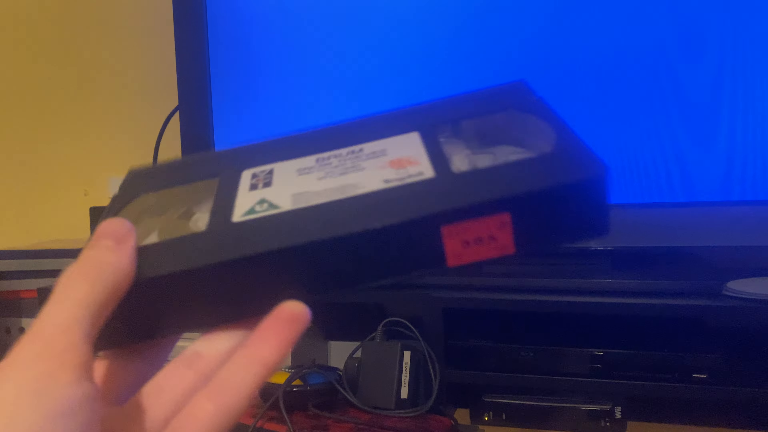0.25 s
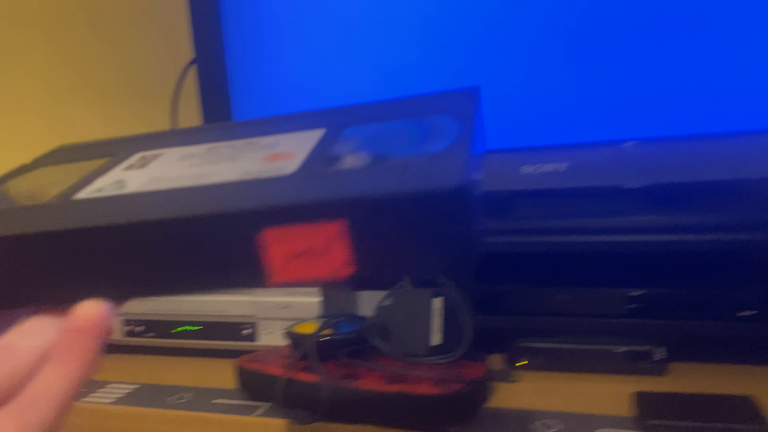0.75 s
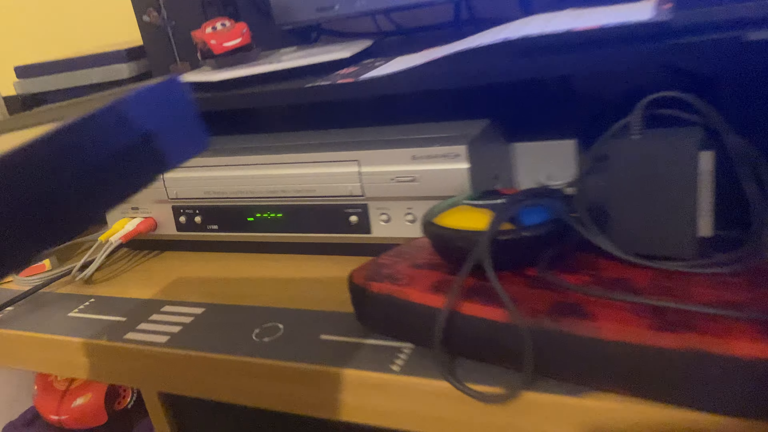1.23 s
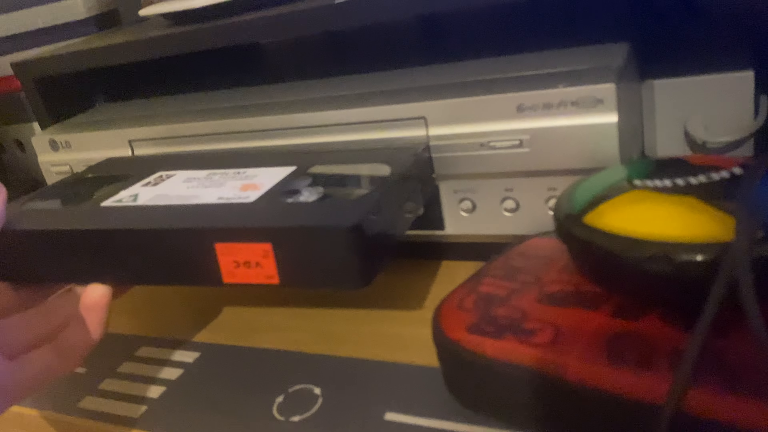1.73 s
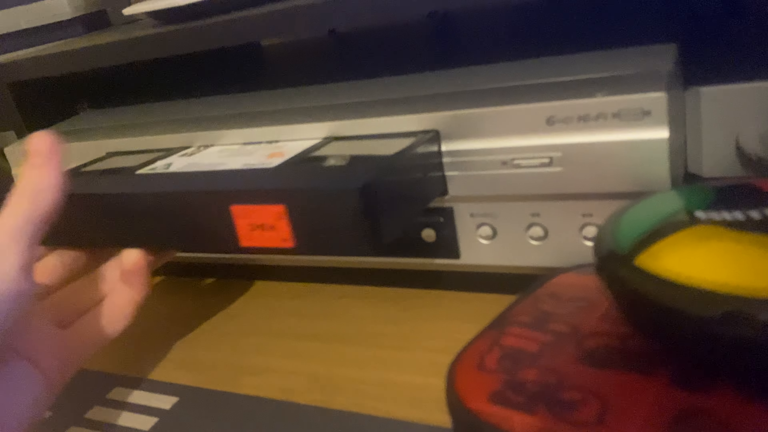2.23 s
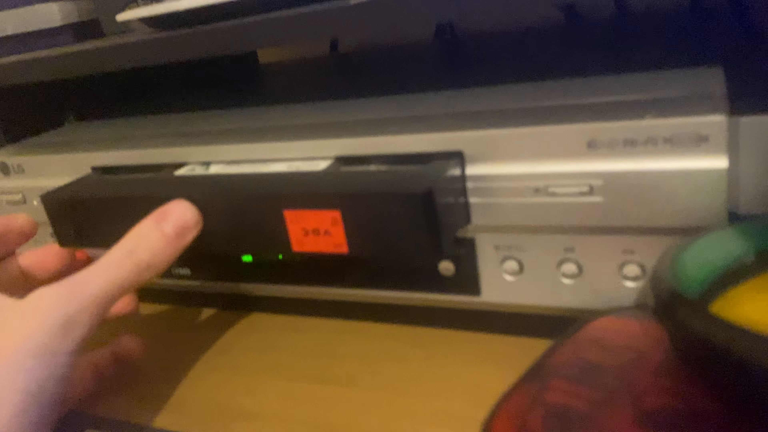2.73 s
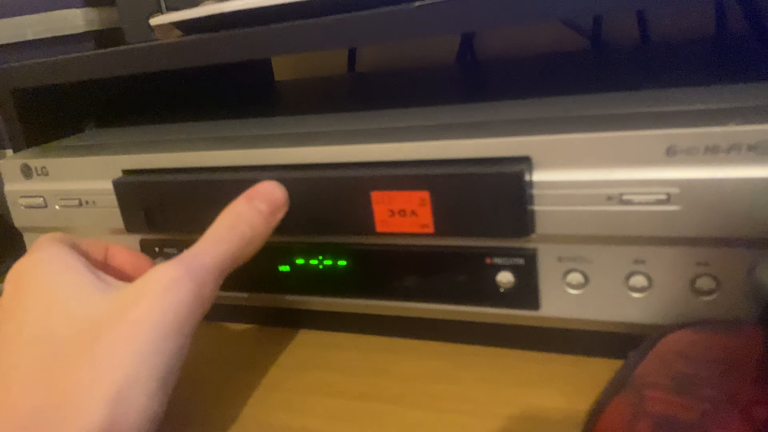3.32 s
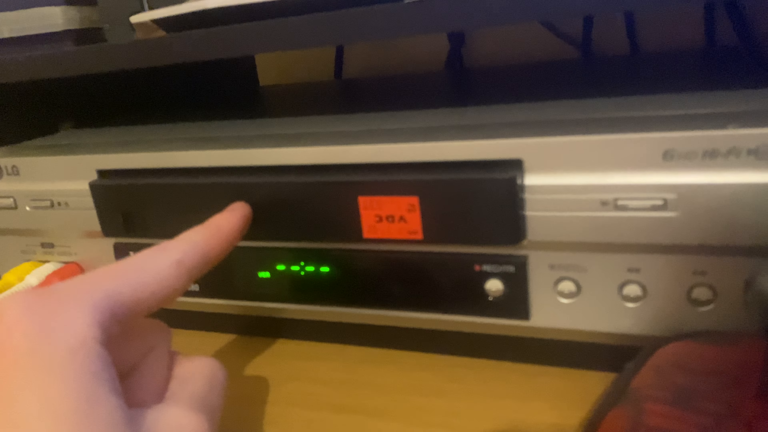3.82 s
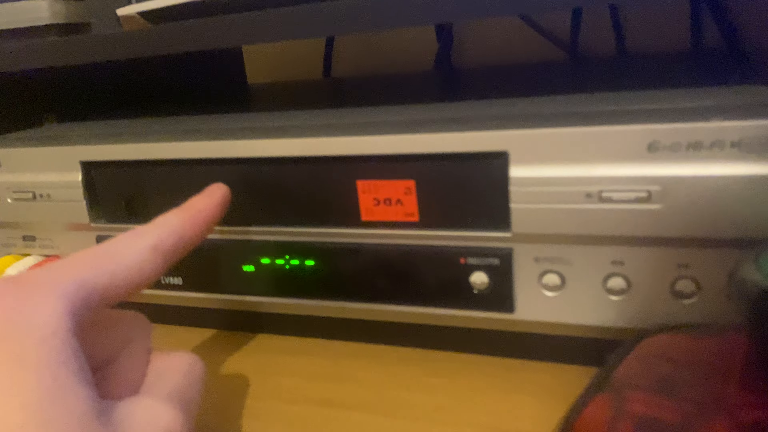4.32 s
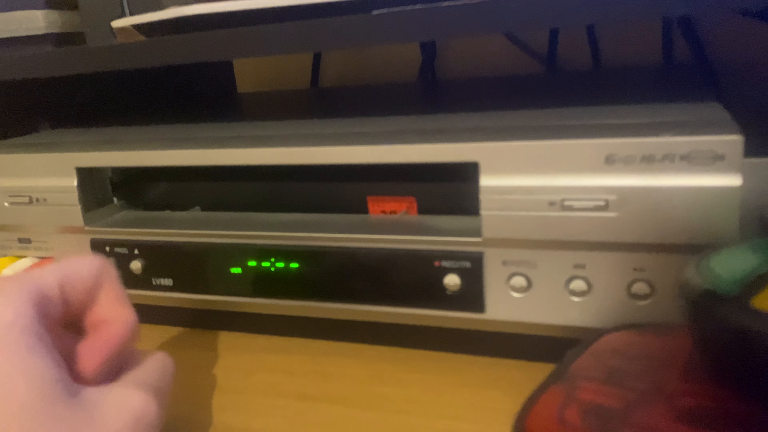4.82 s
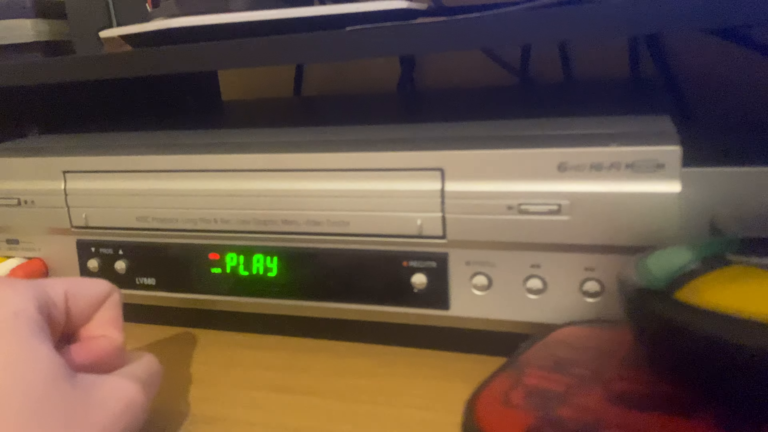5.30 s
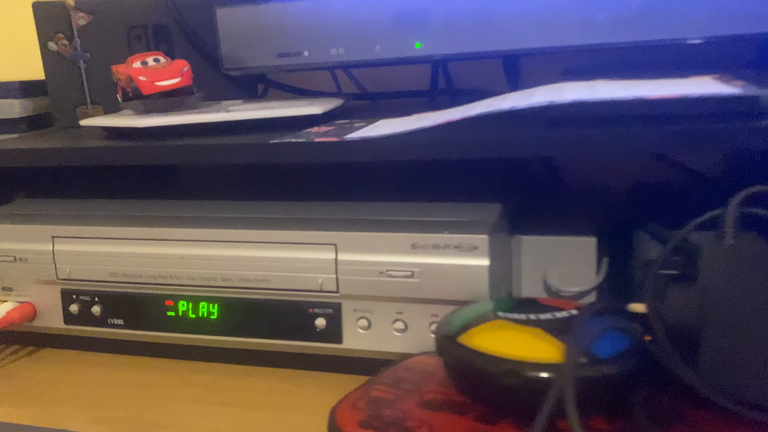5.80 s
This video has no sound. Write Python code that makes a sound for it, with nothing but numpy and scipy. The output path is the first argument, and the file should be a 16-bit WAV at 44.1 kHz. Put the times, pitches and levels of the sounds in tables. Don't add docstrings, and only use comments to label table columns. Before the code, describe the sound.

Close hand-held sound in a small quiet room: bumps, a burst of hollow plastic clatter, clicks, motor whirr, sharp clunk, faint steady whine.

```python
import sys
import numpy as np
from scipy import signal
from scipy.fft import rfft, irfft, next_fast_len
from scipy.io import wavfile
from scipy.ndimage import uniform_filter1d, map_coordinates

SR = 44100
rng = np.random.default_rng(int(sys.argv[2]) if len(sys.argv) > 2 else 0)


def voltage_ratio(decibels):
    exponent = np.asarray(decibels, float) / 20
    return 10 ** exponent


def wav_record(signal):
    frames = np.transpose(np.atleast_2d(signal))
    bounded = np.clip(frames, -1, 1)
    quanta = np.round(bounded * 32767).astype(np.int16)
    wavfile.write(sys.argv[1], SR, quanta)


N = 266893

# (time [s], level [dB])
SLIDE_PRESSURE = [(0, -64), (.72, -63.5), (.86, -51), (1.04, -63.5), (1.46, -56.5), (1.7, -37.5),
                  (1.85, -58.5), (2.11, -41), (2.51, -42), (2.7, -52), (3.03, -67.5), (3.32, -54),
                  (3.66, -67.5), (3.9, -65), (4.8, -53), (5.24, -55), (5.4, -63.5), (6.05, -64)]


def unit(x):
    return x / np.sqrt(np.mean(x ** 2) + 1e-20)


def along(points, hz):
    f, v = np.transpose(points)
    return np.interp(np.log(hz + 1), np.log(f + 1), v)


def curves(rows):
    s, *columns = np.transpose(rows)
    t = np.arange(N) / SR
    gate = uniform_filter1d(1. * (t >= s[0]) * (t <= s[-1]), size=2000)
    return [np.interp(t, s, column) for column in columns] + [gate]


def wobble(rate):
    knots = rng.standard_normal(int(N * rate / SR) + 4)
    return map_coordinates(knots, [np.arange(N) * rate / SR])


def filtered(x, response):
    m = next_fast_len(x.shape[-1] + 8192)
    spectrum = rfft(x, m) * response(np.fft.rfftfreq(m, 1 / SR))
    return irfft(spectrum, m)[..., :x.shape[-1]]


def low_cut(hz, corner, order=2):
    return hz ** order / (hz ** order + corner ** order)


def modes(peaks):
    def response(f):
        total = 0
        for k, (centre, width, db) in enumerate(peaks):
            total = total + (-1) ** k * voltage_ratio(db) * 1j * f * width / (centre ** 2 - f * f + 1j * f * width)
        return total
    return response


def hiss(spectrum, flutter_db, rate):
    pair = filtered(rng.standard_normal((2, N)), lambda hz: voltage_ratio(along(spectrum, hz)))
    return unit(pair * voltage_ratio(flutter_db * wobble(rate)))


def tone(hz, blur):
    phase = 2 * np.pi * np.cumsum(hz) / SR + blur * wobble(40)
    return np.sqrt(2) * np.sin(phase) * [[1.3], [.3]]


def room_air():
    # (frequency [Hz], level [dB per Hz])
    air = [(100, 2.5), (300, -1.5), (1200, 2.5), (2500, 1), (5500, -12.5), (7500, -22), (10500, -17),
           (14500, -14.5), (15200, -14), (15700, -20)]
    return voltage_ratio(-68.5) * hiss(air, 0.59, 18)


def screen_whistle():
    return voltage_ratio(-86.5) * tone(15190 + 90 * wobble(200), 0.8)


def far_engine():
    # (time [s], pitch [Hz], level [dB], upper drone level [dB])
    drone = [
        (0, 189, -82, -64),
        (.24, 189.1, -75, -65),
        (.28, 182, -63, -63),
        (.9, 186.2, -59, -67.5),
        (1.05, 187.8, -74, -71),
        (1.3, 179, -88, -67),
    ]
    hz, db, upper_db, gate = curves(drone)
    upper = unit(filtered(rng.standard_normal((2, N)), modes([(495, 40, -1.2), (640, 60, -0.31)])))
    note = voltage_ratio(db) * tone(hz, 0.67)
    low_order = voltage_ratio(-63 + 3 * wobble(9.9)) * tone(.4 * hz, 0.6)
    return gate * (note + low_order + voltage_ratio(upper_db) * upper)


def handling_rumble():
    # (time [s], level [dB])
    grip = [(0, -72), (.2, -64.5), (.42, -62), (.67, -63), (.81, -55), (.94, -63), (1.41, -73.5),
            (1.53, -53), (1.7, -50.5), (1.85, -52.5), (2.03, -83.5), (2.42, -60.5), (2.8, -90), (3.32, -72),
            (4.04, -93), (4.63, -79), (4.9, -62), (5.1, -83)]
    # (frequency [Hz], level [dB per Hz])
    deep_colour = [(25, -30), (45, 18), (72, 19.5), (100, 17), (140, -48.5)]
    # (frequency [Hz], level [dB per Hz])
    low_colour = [(80, -14), (130, 4.5), (200, 8.5), (300, -3), (450, -0.5), (800, -43)]
    grip_over_deep_db, shelf_db = 2, -10
    deep_db = np.interp(np.arange(N) / SR, *np.transpose(grip))
    low_level = np.hypot(voltage_ratio(deep_db + grip_over_deep_db), voltage_ratio(curves(SLIDE_PRESSURE)[0] + shelf_db))
    deep = hiss(deep_colour, 2.1, 9)
    quarter_turned = filtered(deep[0], lambda f: 1j)
    deep = np.array([deep[0], .9 * quarter_turned + .4 * deep[1]])
    return voltage_ratio(deep_db + 6) * deep + low_level * hiss(low_colour, 3, 19)


def rubbing():
    # (frequency [Hz], level [dB per Hz])
    body_colour = [(250, -6), (600, -4.5), (1100, -1), (1800, 1), (2400, -6.5), (3500, -44)]
    # (frequency [Hz], level [dB per Hz])
    hiss_colour = [(1500, -25), (2600, -0.5), (5000, -8), (7500, -16.5), (11000, -12.5), (15500, -31)]
    press_db, hiss_at_press_db, hiss_growth = -54.5, -65, 1.11
    body_db, _ = curves(SLIDE_PRESSURE)
    hiss_db = hiss_at_press_db + hiss_growth * (body_db - press_db)
    grain = voltage_ratio(1.5 * wobble(45))
    body = voltage_ratio(body_db) * hiss(body_colour, 1.5, 120)
    bright = voltage_ratio(hiss_db - 2) * hiss(hiss_colour, 2, 200)
    return grain * (body + bright)


def contacts():
    # (time [s], peak [dB], rattle t60 [s], boom [dB])
    thuds = [(0.1932, -54.5, 0.096, -1.5), (0.6681, -50.5, 0.16, -13), (1.0623, -52.5, 0.046, -16),
             (1.2055, -44.5, 0.025, 0), (1.883, -53, 0.039, -8), (2.0542, -19, 0.056, -6),
             (2.109, -40.5, 0.042, -6), (2.3845, -22.5, 0.066, -5), (2.4268, -36, 0.024, 22.5),
             (2.4543, -40, 0.23, -6), (2.522, -37, 0.2, -2), (2.553, -31.5, 0.055, -7),
             (3.0257, -37, 0.075, 3.5), (3.378, -64, 0.1, 11.5), (3.837, -48.5, 0.076, -8.5),
             (4.243, -41, 0.055, -6), (4.279, -47, 0.055, -5), (4.575, -49, 0.28, -2.5),
             (4.7506, -24, 0.12, -6.5), (4.7658, -23, 0.1, -10), (4.7773, -20, 0.018, 4),
             (4.798, -29.5, 0.057, -7), (4.88, -40.5, 0.13, -7.5), (5.129, -33.5, 0.13, -17.5),
             (5.1594, -45, 0.062, -10), (5.243, -50.5, 0.051, 5), (6.0444, -55, .07, 11)]
    # (time [s], peak [dB], rattle t60 [s], sparkle [dB])
    clacks = [(0.304, -37.5, 0.051, -18), (1.405, -45.5, 0.12, -22), (1.496, -50, 0.1, -30),
              (1.5704, -17, 0.091, -6.5), (1.6128, -17.5, 0.049, 0.5), (1.6385, -26, 0.085, 2),
              (1.6575, -19, 0.087, 2), (1.7316, -22, 0.05, 0), (1.9134, -24.5, 0.13, -8.5),
              (1.9619, -22, 0.099, -4), (1.989, -22, 0.088, -7), (2.0083, -12, 0.076, -4),
              (2.1443, -26.5, 0.05, -18), (2.1528, -20.5, 0.044, -12), (2.1946, -23.5, 0.1, -14),
              (2.207, -29, 0.042, -11), (2.2447, -21.5, 0.054, -2), (2.2684, -22, 0.096, -2.5),
              (2.285, -26, 0.058, -5), (2.3175, -32, 0.091, -9), (2.333, -28, .043, -8),
              (2.592, -31, 0.07, -24)]
    # (time [s], peak [dB], rattle t60 [s], sparkle [dB])
    ticks = [(0.318, -37, .085, -17.5), (0.753, -43.5, 0.13, -10), (1.4227, -45, 0.14, -9),
             (1.5775, -10.5, 0.032, -8), (1.5954, -41, 0.029, -22), (1.6185, -20.5, 0.08, -16),
             (1.677, -23, 0.095, -20), (1.713, -24.5, 0.11, -8.5), (2.09, -30.5, 0.075, -10.5),
             (2.6142, -29, 0.038, -15.5), (2.7192, -34, 0.042, -8.5), (2.9963, -40, 0.17, -11),
             (3.473, -53, .053, -4.5), (3.631, -46.5, 0.029, -37), (3.907, -38, 0.069, -16),
             (3.9791, -48, 0.081, -32), (4.1763, -47, 0.025, -1), (4.621, -36.5, 0.033, -4),
             (5.5924, -50.5, 0.092, 0.5), (5.8928, -50.5, 0.13, -13.5)]
    # (time [s], peak [dB], rattle t60 [s], sparkle [dB])
    levers = [(2.8485, -49, 0.21, -10), (2.8775, -44.5, 0.21, -15), (2.9396, -37.5, 0.23, -14.5),
              (3.2547, -28, 0.063, -12.5), (3.279, -42.5, 0.14, -11), (3.341, -31, 0.093, -18),
              (3.3472, -24.5, 0.048, -6.5), (3.936, -41, 0.095, -24), (4.3136, -51.5, .07, -3.5),
              (4.7172, -34, 0.047, -17), (4.729, -25.5, 0.177, 1.5), (4.738, -29.5, 0.084, -0.5),
              (4.9057, -25.5, 0.14, -8), (4.926, -26.5, 0.036, 0.5), (4.949, -38, 0.031, -20),
              (5.195, -41, 0.11, -8)]
    found = []
    for s, db, t60, boom_db in thuds:
        sparkle_db = -4.5 + .4 * (db + 18.5)
        found.append((s, db, -0.5, boom_db, sparkle_db, t60))
    for rows, shell_db, boom_db in [(ticks, -26, -23), (clacks, -3, -16), (levers, -2.5, -14.5)]:
        for s, db, t60, sparkle_db in rows:
            found.append((s, db, shell_db, boom_db, sparkle_db, t60))
    return sorted(found)


def knocks():
    # (frequency [Hz], level [dB])
    plastic = [(640, 4), (920, 4.5), (1150, -3.5), (1270, -3), (1440, -2), (1880, 1), (2050, -6),
               (2290, -3.5), (2440, -11.5), (3570, -4), (4400, -11), (5400, -8.5), (6450, -2.5),
               (11350, -12.5)]
    # (frequency [Hz], level [dB per Hz])
    clack_colour = [(500, -8.5), (1300, 3), (2200, 3.5), (3500, -9.5), (5000, -6.5), (6500, -11.5),
                    (9000, -52)]
    # (frequency [Hz], level [dB per Hz])
    sparkle_colour = [(4000, 0), (6500, 1.5), (9000, 5.5), (11300, 6), (12500, 2.5), (15500, -2.5)]
    # (frequency [Hz], width [Hz], level [dB])
    shell_modes = [(756, 220, -4.5), (900, 163, 4.5), (1150, 224, -2.5)]
    # (frequency [Hz], width [Hz], level [dB])
    case_modes = [(203, 60, -1.5), (302, 51, 9), (345.7, 98, -1)]
    mode_hz, mode_db = np.transpose(plastic)[:, :, None]
    clack, sparkle, shell, boom, ring = np.zeros((5, 2, N + SR))
    for s, db, shell_db, boom_db, sparkle_db, t60 in contacts():
        noise = rng.standard_normal((3, SR // 6))
        chance = rng.standard_normal((3, len(plastic), 1))
        t60 = np.clip(t60, .015, .3)
        noise = noise[:, :round(t60 * SR)]
        t = np.arange(noise.shape[1]) / SR
        fast = uniform_filter1d(noise[2], size=40)
        slow = uniform_filter1d(noise[0] + noise[1], size=200)
        chatter = voltage_ratio(15.6 * fast + 12 * slow)
        start = 1 - np.exp(-t / (0.017 * t60))
        shape = voltage_ratio(db - 2.5 - 60 * (t / t60) ** 1.55) * start
        burst = shape * chatter * noise[:2]
        at = slice(round(s * SR), round(s * SR) + len(t))
        clack[:, at] += burst
        sparkle[:, at] += voltage_ratio(sparkle_db - 60 * t / 0.12) * burst * chatter ** 0.55
        shell[:, at] += voltage_ratio(shell_db) * burst
        case_start = 1 - np.exp(-t / 0.014)
        boom[:, at] += voltage_ratio(boom_db + 7) * case_start * shape * noise[:2]
        phase = 2 * np.pi * (mode_hz * (1 + 0.028 * chance[1]) * t + chance[2])
        high_db = np.where(mode_hz > 6000, sparkle_db + 5.5, 0)
        kind_db = np.where(mode_hz < 1500, shell_db + 4, high_db)
        strength = voltage_ratio(mode_db + 4.5 * chance[0] + kind_db)
        notes = [np.sum(strength * np.sin(phase), 0), np.sum(strength * np.cos(phase), 0)]
        ring[:, at] += voltage_ratio(-20.0) * shape * np.array(notes)
    high = filtered(clack, lambda hz: voltage_ratio(along(clack_colour, hz) + 3.0))
    high = high + filtered(sparkle, lambda hz: voltage_ratio(along(sparkle_colour, hz) - 1))
    high = filtered(high + ring, lambda hz: low_cut(hz, 260))

    def case_response(hz):
        return modes(case_modes)(hz) / (1 + (hz / 520) ** 4) * low_cut(hz, 130)

    hollow = voltage_ratio(13.5) * filtered(shell, lambda hz: modes(shell_modes)(hz) * low_cut(hz, 540, 3))
    case = voltage_ratio(19.0) * filtered(boom, case_response)
    return (high + hollow + case)[:, :N]


def room(x):
    # (frequency [Hz], t60 [s])
    decay = [(200, 0.58), (1500, 0.29), (6000, 0.22), (14000, 0.15)]
    hz, t, z = signal.stft(rng.standard_normal((2, SR // 2)), SR, nperseg=256)
    fading = voltage_ratio(-60 * t / along(decay, hz)[:, None])
    tail = signal.istft(z * fading, SR, nperseg=256)[1]
    late = np.pad(x, ((0, 0), (300, 0)))
    return signal.fftconvolve(late, tail / np.linalg.norm(tail[0]), axes=1)[:, :N]


def swishes():
    # (centre [s], half length
    # [s], level [dB], pitch [Hz], width [Hz])
    hand = [(0.198, 0.022, -59.5, 2000, 1100), (0.762, 0.018, -53.5, 4140, 1700),
            (0.835, 0.048, -52.5, 1600, 7600), (0.989, 0.07, -54, 1460, 2500),
            (1.172, 0.032, -45, 1720, 680), (1.193, 0.056, -55, 3200, 4000),
            (3.238, 0.023, -49.5, 850, 1650), (3.12, 0.038, -61, 64, 48.8), (3.418, 0.046, -60, 69.6, 60),
            (4.248, 0.025, -51.5, 200, 54), (4.75, 0.014, -34, 6400, 780),
            (4.745, 0.0093, -31.5, 5200, 960), (5.017, 0.066, -53.5, 76, 30),
            (5.627, 0.041, -66.5, 4500, 2980), (5.919, 0.051, -64, 2400, 2600),
            (5.142, 0.013, -38, 1090, 400), (2.89, 0.042, -47, 890, 920), (2.28, 0.0303, -30, 780, 420)]
    # (centre [s], half length [s], level [dB], pitch [Hz], width [Hz])
    nails = [
        (.821, .0018, -31, 1900, 1100),
        (1.499, .0046, -29, 1280, 330),
        (1.498, .003, -42, 2500, 1200),
    ]
    # (centre [s], half length [s], level [dB], pitch [Hz], width [Hz])
    rails = [
        (4.9, .11, -64, 3050, 2000),
        (5.165, 0.016, -53.5, 4400, 1500),
        (5.265, 0.0055, -73, 10000, 5000),
        (2.4, .02, -55, 2500, 2100),
        (5.63, 0.033, -69, 11300, 1500),
    ]
    out = np.zeros((2, N + SR))
    span = np.arange(-SR // 6, SR // 6) / SR
    for s, half, db, hz, width in hand + nails + rails:
        noise = rng.standard_normal((2, len(span)))
        noise = unit(filtered(noise, lambda f: modes([(hz, width, 0)])(f) ** 2))
        swell = np.exp(-(span / half) ** 2)
        out[:, round(s * SR) - SR // 6:][:, :len(span)] += voltage_ratio(db) * swell * noise
    return out[:, :N]


def snaps():
    # (time [s], peak [dB], pitch [Hz])
    sharp_contacts = [(1.5704, -27.5, 3120), (1.5785, -17, 2417), (1.58, -18.5, 3620), (1.5825, -19.5, 1297),
                      (1.5962, -17, 4310), (1.613, -21.5, 4470), (1.6185, -20, 3500), (1.6187, -21.5, 1100),
                      (1.641, -27, 3000), (1.66, -23, 4590), (1.665, -22, 5640), (1.669, -22, 1004),
                      (1.673, -24.5, 3410), (1.7155, -28, 2730), (1.7337, -26, 2910), (1.742, -26.5, 1002),
                      (1.9154, -26.5, 900), (1.92, -31, 2200), (1.9637, -21, 4360), (1.9865, -24.5, 5000),
                      (1.999, -25.5, 1200), (2.01, -13.5, 2295), (2.0115, -16, 4505), (2.019, -17.5, 1490),
                      (2.035, -23.5, 2200), (2.0555, -21, 4000), (2.0865, -33, 3970), (2.106, -29, 1000),
                      (2.1445, -24.5, 989), (2.157, -28.5, 5500), (2.16, -24.5, 988), (2.1952, -28, 3300),
                      (2.209, -27, 2214), (2.247, -24, 4370), (2.248, -25.5, 7450), (2.2755, -20.5, 944),
                      (2.286, -21.5, 993), (2.287, -31, 5400), (2.309, -32, 3950), (2.335, -31, 1990),
                      (2.3857, -19.5, 1108), (2.532, -37, 1310), (2.556, -32, 722), (2.5938, -34, 2200),
                      (2.6, -29, 1743), (2.62, -37.5, 3000), (2.7195, -27.5, 1966),
                      (.3055, -37, 2820), (.312, -41, 3600), (.82, -38, 1500), (2.334, -30, 1150),
               (2.397, -27, 747), (2.45, -38, 1300), (2.9385, -41, 1490), (3.259, -31.5, 3280),
               (3.352, -31, 1807), (4.7298, -22.5, 1354), (4.7305, -25, 6770), (4.7385, -24, 5100),
               (4.743, -24, 6900), (4.752, -24, 6300), (4.7655, -19.5, 4810), (4.7665, -15, 900),
               (4.7775, -21.5, 1303), (4.896, -34, 1000), (4.9075, -28.5, 1092), (4.9125, -29.5, 6000),
               (4.9255, -26, 1150), (4.9275, -30, 4580), (5.132, -34, 1050)]
    # (time [s], peak [dB], pitch [Hz])
    pawls = [
        (2.5237, -39, 4430),
        (2.9951, -45, 3910),
        (3.0265, -40, 4780),
        (3.908, -45, 5080),
        (4.1774, -45, 5050),
        (4.6217, -41, 4340),
        (5.1314, -30, 3430),
        (5.142, -42, 3440),
        (5.1662, -44, 4080),
        (5.1981, -50, 3840),
    ]
    # (time [s], peak [dB], pitch [Hz])
    faces = [
        (1.576, -19, 1250),
        (1.64, -27, 1070),
        (1.644, -24, 1090),
        (1.658, -22, 1126),
        (1.764, -32, 972),
        (2.056, -22, 762),
        (2.275, -19.5, 727),
        (5.248, -44, 1140),
    ]
    # (time [s], peak [dB], pitch [Hz])
    flap_edges = [(1.6177, -24, 6510), (1.6444, -28, 6500), (1.6596, -24, 6410), (1.6714, -29, 6540),
                  (1.6804, -31, 6610), (1.735, -31, 6280), (2.7197, -44, 5960), (1.615, -27, 11300),
                  (1.659, -27, 11200), (1.583, -31, 11300), (1.675, -33, 11000)]
    # (time [s], peak [dB],
    # pitch [Hz], t60 [s])
    lid = [(2.061, -27.5, 200, 0.075), (2.392, -25, 295, 0.09), (2.427, -30, 292, .06),
           (2.442, -33, 290, 0.053), (2.465, -32.5, 253, 0.083), (2.475, -33, 276, .06),
           (2.513, -34, 273, 0.093), (2.562, -35.5, 302, 0.11), (4.756, -29, 298, 0.046),
           (4.778, -21.5, 347, 0.067), (4.795, -23.5, 330, 0.055), (4.93, -35, 313, 0.094),
           (5.215, -52, 300, 0.1), (.819, -25.5, 673, 0.035), (.882, -37, 150, 0.067),
           (4.95, -43, 1060, .2), (4.995, -50, 1730, .2), (5.01, -55, 730, .2), (5.03, -53, 1046, .2),
           (5.24, -45, 1150, .1)]
    rings = []
    for rows, gain_db in [(sharp_contacts, 4), (pawls + faces, 0)]:
        for s, db, hz in rows:
            rings.append((s, db + gain_db, hz, .012 + 13.8 / hz, .0007))
    rings += [(s, db + 3, hz, .024, .0015) for s, db, hz in flap_edges]
    rings += [(*row, .003) for row in lid]
    out, t = np.zeros((2, N + SR)), np.arange(SR // 8) / SR
    for s, db, hz, t60, rise in rings:
        phase = 2 * np.pi * hz * t
        if rise < .002:
            phase = phase + .9 * np.sin(2 * np.pi * .21 * hz * t)
        shape = voltage_ratio(db - 60 * t / np.clip(t60, .004, .2)) * (1 - np.exp(-t / rise))
        pair = np.array([np.sin(phase), voltage_ratio(-1) * np.sin(phase + hz * s)])
        out[:, round(s * SR):][:, :len(t)] += shape * pair
    return out[:, :N]


def bumps():
    # (time [s], peak [dB], start [Hz], sweep [s], low ring [dB])
    hits = [
        (0.8196, -17.5, 1036, 0.003, -13),
        (0.877, -54, 197, 0.0029, 24.5),
        (1.497, -27.5, 495, 0.0013, -4),
        (2.716, -32.5, 2530, 0.00428, -23),
        (4.764, -18.5, 900, 0.0039, -28),
    ]
    out, t = np.zeros((2, N + SR)), np.arange(SR // 6) / SR
    for s, db, start_hz, sweep, ring_db in hits:
        phase = 2 * np.pi * np.cumsum(150 + start_hz * np.exp(-t / sweep)) / SR
        chirp = np.sin(phase) * (t / 0.0063) ** 1.5 * np.exp(1.5 - 1.355 * t / 0.0036)
        swell = voltage_ratio(ring_db) * (t / 0.0096) * np.exp(1 - t / 0.0098)
        low_phase = 2 * np.pi * 66 * t
        pair = np.array([chirp + swell * np.sin(low_phase), swell * np.cos(low_phase)])
        out[:, round(s * SR):][:, :len(t)] += voltage_ratio(db) * pair
    return out[:, :N]


def loading_gears():
    # (time [s], level [dB])
    loader = [
        (3.9, -120),
        (3.96, -68),
        (4.2, -66.5),
        (4.45, -65.5),
        (4.7, -60),
        (5.2, -73),
        (5.3, -105),
    ]
    # (frequency [Hz], width [Hz], level [dB])
    gear_bands = [(4050, 240, 4), (2900, 460, -3), (4950, 160, -6), (5700, 180, 1), (6300, 130, -2),
                  (6900, 180, -6), (7700, 200, -9), (10440, 470, -2.5), (11300, 420, -6), (12100, 250, -5)]
    level_db, gate = curves(loader)
    teeth = rng.standard_normal((2, N))
    first = filtered(teeth, modes(gear_bands[:1]))
    rest = filtered(teeth, modes(gear_bands[1:]))
    fade = voltage_ratio(-60 * np.clip(np.arange(N) / SR - 4.4, 0, 1))
    return gate * voltage_ratio(level_db) * (fade * first - rest) / np.std(first - rest)


def lifting_whine():
    # (time [s], pitch [Hz], level [dB])
    strain = [(4.12, 1128, -72), (4.15, 1150, -55), (4.185, 1150, -67), (4.24, 1160, -50.5),
              (4.29, 1120, -58), (4.37, 1190, -55.5), (4.42, 1150, -57), (4.465, 1170, -50),
              (4.495, 1243, -56), (4.52, 1180, -70), (4.57, 1150, -56), (4.61, 1154, -70)]
    # (time [s], pitch [Hz], level [dB])
    drop = [
        (4.57, 860, -68),
        (4.615, 864, -59),
        (4.645, 950, -59.5),
        (4.665, 1000, -68),
        (4.69, 1100, -59.5),
        (4.73, 1070, -68),
    ]
    hz, db, gate = curves(strain)
    loaded = gate * voltage_ratio(db) * (.55 + .55 * wobble(150)) * tone(hz + 18 * wobble(30), .95)
    hz, db, gate = curves(drop)
    return loaded + gate * voltage_ratio(db) * (.5 + .6 * wobble(120)) * tone(hz, .7)


def drum_whine():
    # (time [s], pitch [Hz], level [dB], threading whistle level [dB])
    drum = [
        (5.26, 1280, -65, -84.5),
        (5.45, 1252, -66, -80),
        (5.6, 1243, -68, -82),
        (5.66, 1240, -70, -110),
        (5.85, 1226, -71, -110),
        (5.95, 1220, -65, -110),
        (6.05, 1216, -64, -110),
    ]
    hz, db, whistle_db, gate = curves(drum)
    whistle = voltage_ratio(whistle_db) * (.8 + .5 * wobble(300)) * tone(np.full(N, 5420.), 3)
    whine = voltage_ratio(db) * (.9 + .25 * wobble(30)) * tone(hz, .3)
    return gate * (whine + whistle)


def scene():
    background = room_air() + screen_whistle() + far_engine()
    hands = handling_rumble() + rubbing() + swishes() + bumps()
    hits = knocks() + snaps()
    echo = voltage_ratio(-11.5) * room(filtered(hits, lambda hz: low_cut(hz, 400)))
    motors = loading_gears() + lifting_whine() + drum_whine()
    return background + hands + hits + echo + motors


def low_pass(x):
    return signal.sosfilt(signal.butter(12, 16810, fs=SR, output="sos"), x)


def record(dry):
    # (frequency [Hz], likeness [0 to 1])
    alike = [(50, .1), (130, .6), (300, .9), (550, .65), (1200, .75), (2200, .45), (5000, .4), (6000, .2),
             (7000, .75), (8200, .65), (9000, .96), (15500, .97)]
    # (frequency [Hz], lead [cycles])
    lead = [(0, 0), (2000, -.52), (6000, -1.5), (6500, -1.12), (7250, -.97), (9250, -.5), (17000, 1.39)]
    # (frequency [Hz], left minus right [dB])
    tilt = [(40, -1), (110, 3), (200, -3), (380, -5), (700, 2), (1290, -2), (2380, 3), (4400, 1),
            (8120, 0.5), (15000, -0.5)]

    def shares(hz):
        angle = np.arccos(np.clip(along(alike, hz), -1, 1)) / 2
        return np.array([np.cos(angle), np.sin(angle)])

    def ports(hz):
        skew = voltage_ratio(along(tilt, hz) / 2) * np.exp(-1j * np.pi * np.interp(hz, *np.transpose(lead)))
        top_cut = voltage_ratio(-np.clip((hz - 15850) / 22, 0, 90))
        return np.array([skew, 1 / skew]) * top_cut * low_cut(hz, 30)

    mid, side = filtered(dry, shares)
    pair = filtered(np.array([mid + side, mid - side]), ports)
    ceiling = .85
    return low_pass(ceiling * np.tanh(pair / ceiling))


dry = scene()
out = record(dry)
wav_record(out)
```